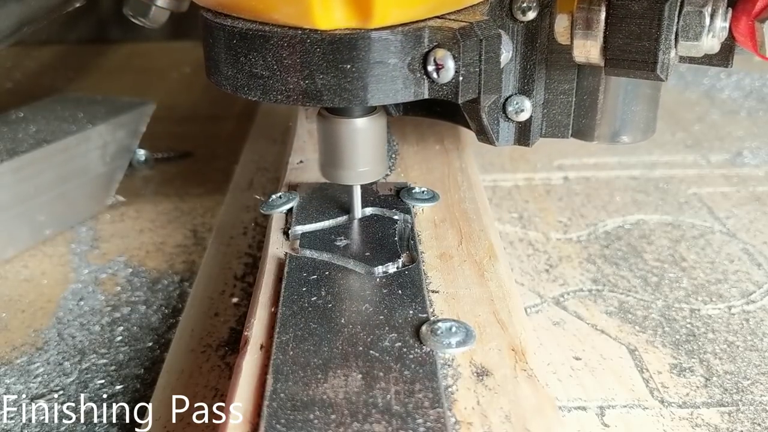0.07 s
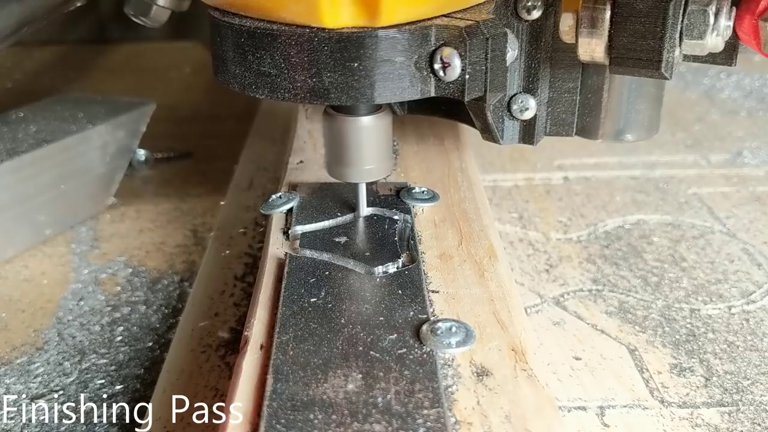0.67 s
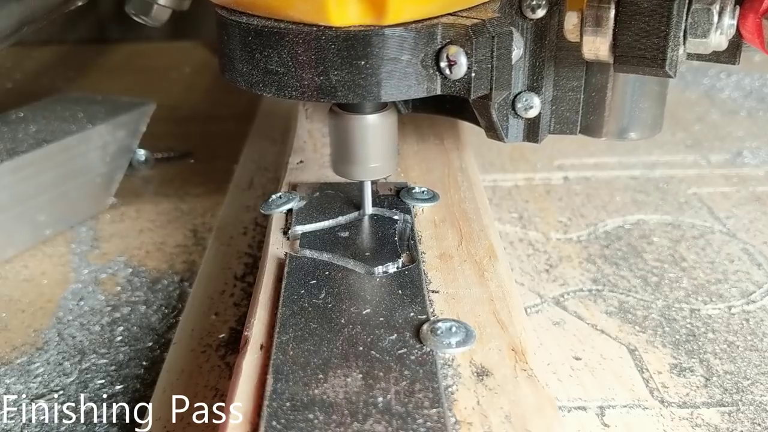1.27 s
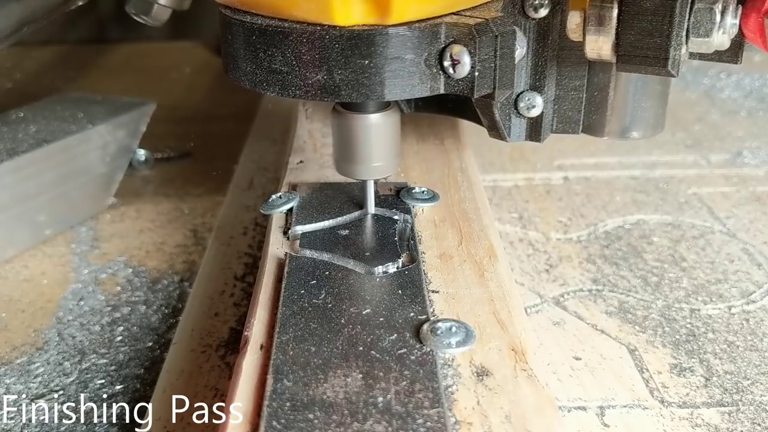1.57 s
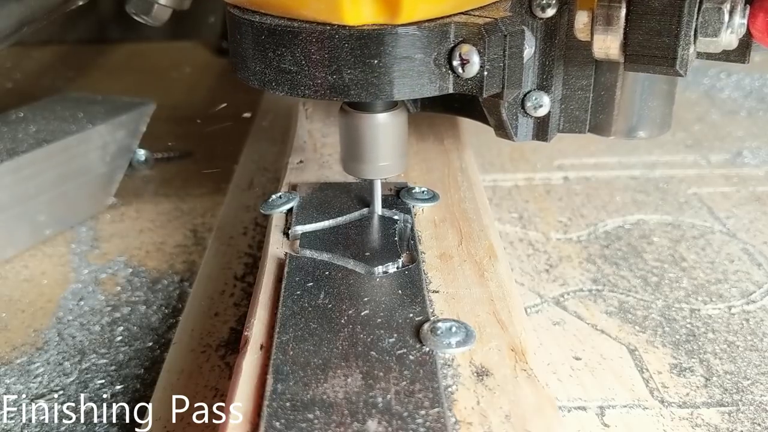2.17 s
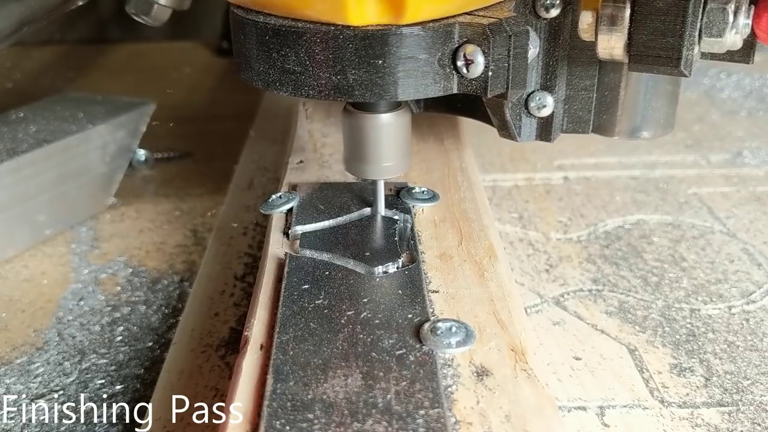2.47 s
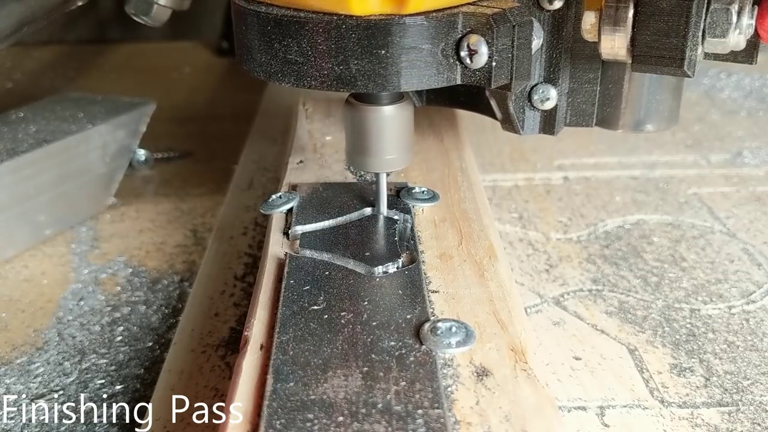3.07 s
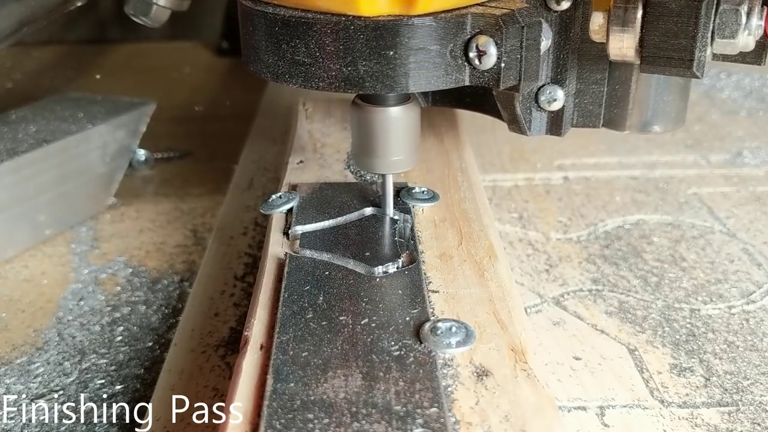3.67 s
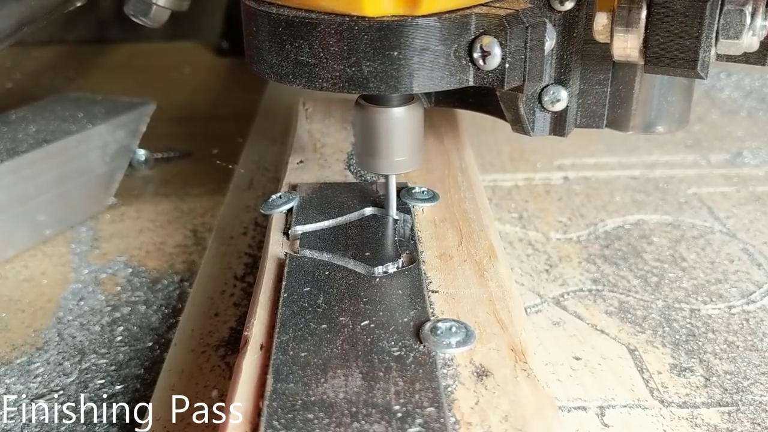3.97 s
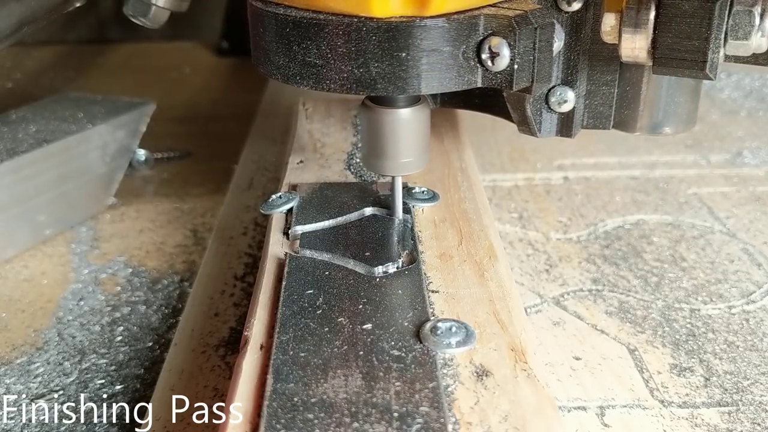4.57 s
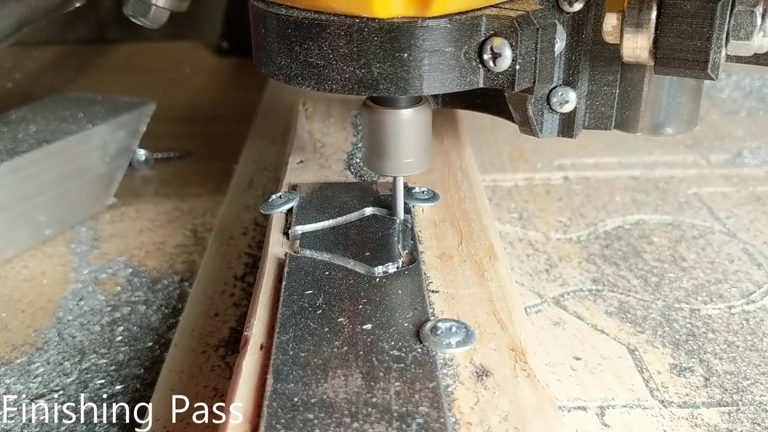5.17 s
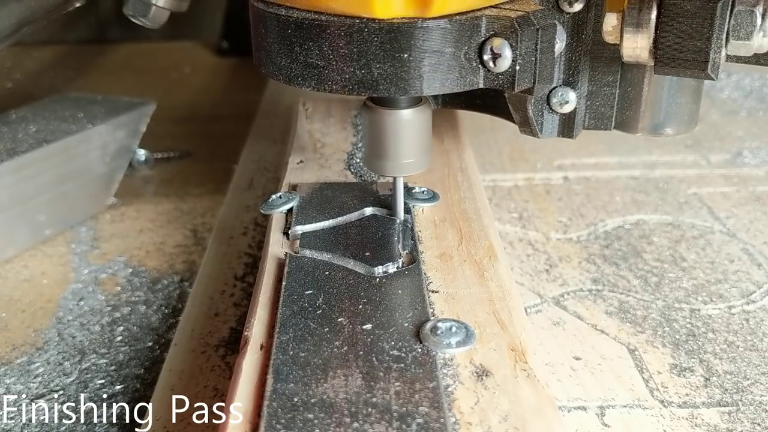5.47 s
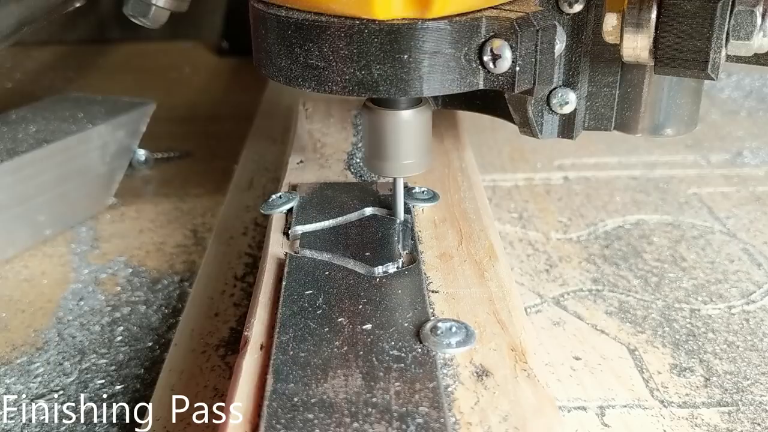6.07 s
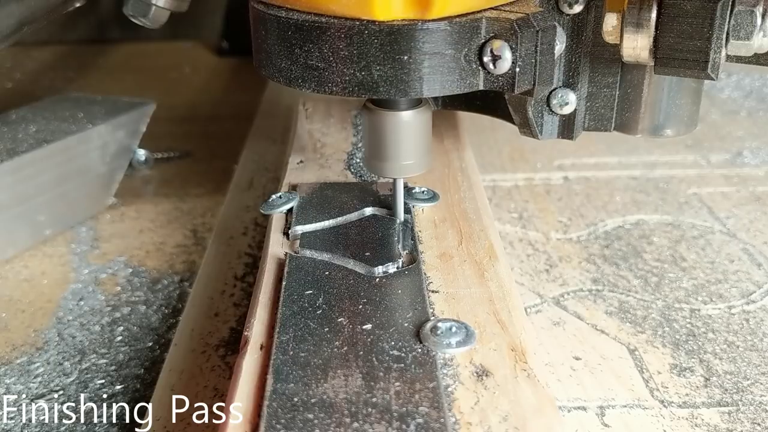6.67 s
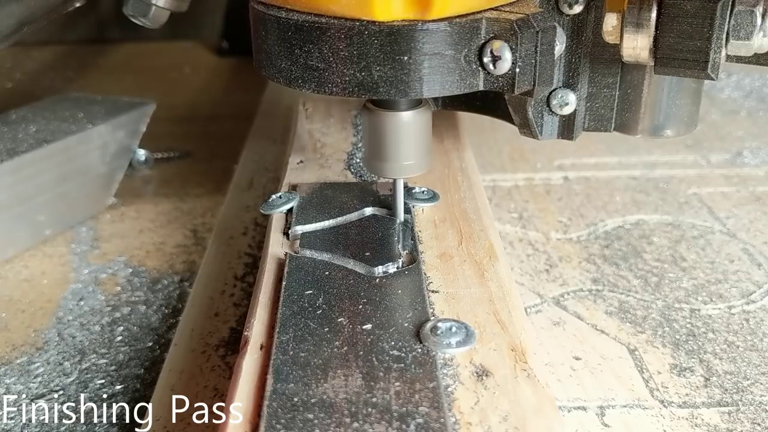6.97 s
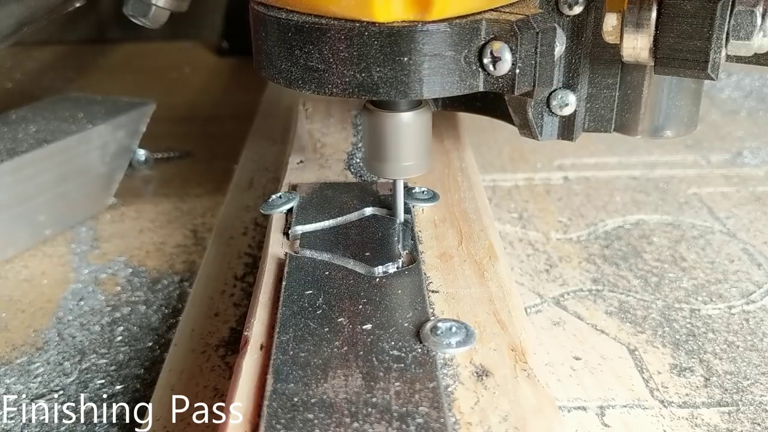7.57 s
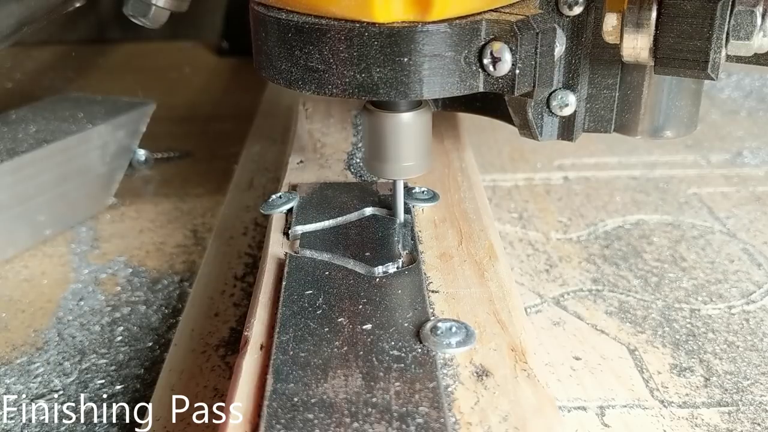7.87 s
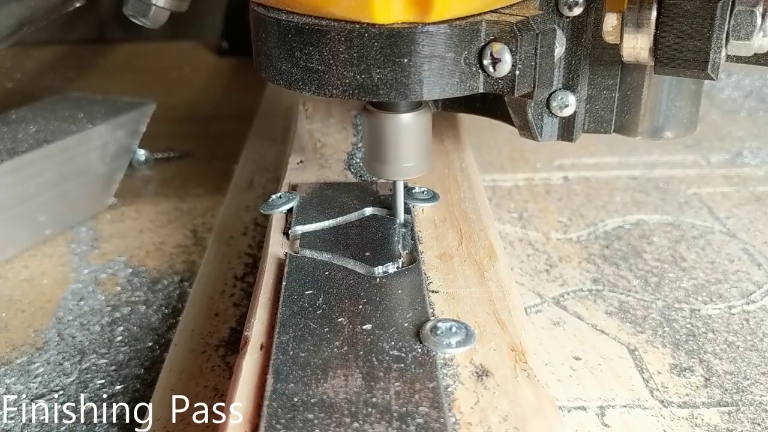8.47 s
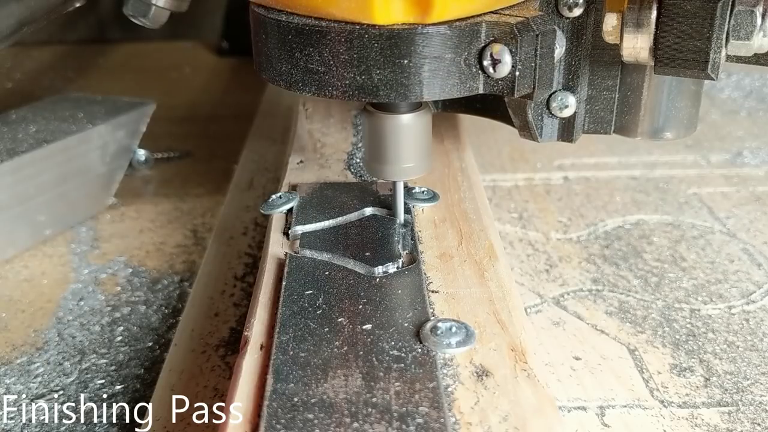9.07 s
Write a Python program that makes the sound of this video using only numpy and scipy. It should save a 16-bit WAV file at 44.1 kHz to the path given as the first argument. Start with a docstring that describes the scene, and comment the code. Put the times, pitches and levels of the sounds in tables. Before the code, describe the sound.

A small router whines and hisses steadily as it cuts steel, very close, with its cooling air buffeting the microphone.

```python
"""A whine over rushing air, very close: a trim router on a small CNC machine, finishing steel.
The whine is its 13-blade fan; cooling air roars in the housing and hisses from the vents.
The cutter rasps while it bites and chatters briefly in a corner. The motor sags under the cut
and speeds up as the cutter comes free. The fan's draught buffets the microphone."""
import sys
import numpy as np
from scipy import signal
from scipy.fft import rfft, irfft, next_fast_len
from scipy.io import wavfile
from scipy.ndimage import uniform_filter1d, minimum_filter1d

SR = 44100
rng = np.random.default_rng(int(sys.argv[2]) if len(sys.argv) > 2 else 0)


def generate_wav(sig):
    """Save sig (samples, or channels by samples) to the path in sys.argv[1] as 16-bit PCM at SR."""
    pcm = np.round(np.clip(np.atleast_2d(sig).T, -1, 1) * 32767).astype(np.int16)
    wavfile.write(sys.argv[1], SR, pcm)


N = 411012

# Draught on the microphone. Each row: time in seconds, relative level in dB.
DRAUGHT_DB = [(0, -32), (.55, -33), (1.0, -38.5), (1.5, -35), (1.7, -41.5), (2.2, -35), (2.55, -39.5),
              (3.2, -38.5), (3.7, -37), (4.55, -38), (4.9, -42.5), (5.35, -39.5), (6.15, -47.5),
              (7.05, -50), (7.2, -41), (8.2, -42.5), (8.36, -35.5), (8.7, -41.5)]
# Turbulence of the draught. Each row: frequency in Hz, relative density in dB.
LARGE_EDDY_SPECTRUM = [(20, -50), (35, -23), (50, -18), (65, 0.5), (125, 1.5), (200, -2.5), (320, -7.5),
                       (500, -13.5), (800, -28), (1600, -42)]
# Smaller eddies of fast air. Each row: frequency in Hz, relative density in dB.
SMALL_EDDY_SPECTRUM = [(20, -46), (35, -22), (60, -2.5), (150, 1.5), (300, 0), (480, -4.5), (750, -7.5),
                       (1600, -38)]
# Strongest puffs. Each row: time in seconds, relative peak in dB.
STRONG_PUFFS = [(0.338, -19), (.46, -22), (.523, -21), (.908, -23), (1.04, -25), (1.256, -24), (1.946, -19),
                (2.236, -21), (2.845, -20), (3.751, -19), (4.394, -19), (5.06, -24), (5.48, -25),
                (5.804, -27), (6.2, -27), (7.834, -22), (8.385, -17), (8.492, -21)]
# Cooling air. Each row: time in seconds, relative rush level in dB, relative hiss level in dB.
AIR_DB = [(0, -29.5, -33), (.75, -30.5, -34), (1.6, -28.5, -32), (2.4, -29, -31), (3.4, -28.5, -31.5),
          (6.4, -28.5, -31), (9.32, -29, -31.5)]
# Rush through the housing. Each row: frequency in Hz, relative density in dB.
RUSH_SPECTRUM = [(40, -8), (120, -22), (350, -20), (590, -10), (800, 1), (1150, -1), (1500, -6.5),
                 (2400, -6), (3100, -1.5), (3900, -1.5), (4300, -4), (5200, -10), (6200, -8), (8000, -27)]
# Housing cavities. Each row: centre in Hz, width in Hz, lift in dB.
HOUSING_RESONANCES = [(840, 130, 2), (1036, 106, 10), (1280, 48, 4.5), (1987, 110, 3.5), (2060, 80, -1),
                      (2637, 62, 3.5), (4240, 180, -4), (4500, 430, 5)]
# Jets at the vents. Each row: frequency in Hz, relative density in dB.
JET_SPECTRUM = [(3500, -25), (5400, -5), (6150, -2), (6800, 2), (7350, 0.5), (7900, -5.5), (8400, -14.5),
                (9500, -14), (11400, -14), (12000, -21.5), (14000, -17.5), (16000, -32)]
# Vent slots. Each row: centre in Hz, width in Hz, lift in dB.
VENT_RESONANCES = [(6165, 260, 4.5), (8940, 260, 4.5), (10270, 320, 4), (12400, 350, 5), (13750, 350, -1)]
# Spindle speed. Each row: time in seconds, turns per second.
SPEED_HZ = [(0, 447.1), (0.88, 445.2), (1.35, 445.3), (2.4, 449.4), (2.75, 448.9), (2.98, 451.5),
            (3.8, 451.6), (4.6, 451.1), (5.0, 453.1), (5.4, 454.0), (6.5, 454.8), (7.8, 455.1),
            (8.35, 454.5), (9.0, 455.5)]
# Shaft tones. Each row: multiple of the speed, free level in dB, full-load level in dB.
SHAFT_HARMONICS = [(1, -49.5, -45.5), (2, -52, -45.5), (3, -63, -57), (4, -52.5, -52.5), (5, -55, -49),
                   (6, -48, -54), (7, -49, -48.5), (8, -75, -55), (9, -53, -45), (11, -67, -55),
                   (12, -49, -52.5), (15, -53, -59), (24, -66, -63), (31, -67, -66)]
# Cutting edge. Each row: multiple of the speed, relative level in dB, lift at full chatter in dB.
RASP_BANDS = [(6, -46, 1), (10, -45, 4), (14, -41.5, -7), (15, -57, 0), (16, -41.5, -4), (17, -40.5, -3),
              (21, -55, 8), (24, -67, 6), (27, -60, 13), (28, -66, 1)]
# Chatter, peaking as the cutter rounds the corner. Each row: time in seconds, strength from 0 to 1.
CHATTER_STRENGTH = [(0, 0.1), (1.4, 0), (1.9, 0.26), (2.35, 0.46), (2.68, 0.85), (2.9, 0.1), (5.0, 0)]
# Tones locked to tool and plate resonances. Each row: multiple of the speed, full-chatter level in dB.
SINGING_HARMONICS = [(6, -40.5), (9, -50), (15, -52)]
# Blade-passing tone. Each row: time in seconds, level in dB before the lift with sag.
BLADE_DB = [(0, -40.5), (.8, -49), (1.4, -47.5), (1.65, -42.5), (2.2, -40), (2.9, -40.5), (3.1, -35),
            (4.15, -33.5), (4.5, -36.5), (5.3, -28), (5.65, -30), (6.2, -31), (6.6, -29), (7.6, -27.7),
            (8.4, -31), (9.32, -29)]
# Octave of the blade tone. Each row: time in seconds, level in dB.
OCTAVE_DB = [(0.0, -39.5), (0.62, -40), (1.27, -44), (1.48, -40.5), (1.76, -39.5), (2.57, -48), (2.73, -42),
             (2.83, -46), (3.66, -40.5), (6.88, -44.5), (8.72, -43), (8.82, -48), (9.03, -45), (9.32, -44)]


def from_db(db):
    """Decibels to gain."""
    return 10 ** (np.asarray(db) / 20)


def unit_rms(x):
    """Scale to rms 1."""
    return x / np.sqrt(np.mean(x ** 2) + 1e-20)


def curves(rows):
    """Each column of a time table, at every sample."""
    times_s, *columns = np.transpose(rows)
    return [np.interp(np.arange(N) / SR, times_s, column) for column in columns]


def drift(rate_hz):
    """Slow random wander, rms 1."""
    hop = 20
    pole = np.exp(-2 * np.pi * rate_hz * hop / SR)
    white = rng.standard_normal(N // hop + 4002)
    slow = signal.lfilter([1], [1, -2 * pole, pole * pole], white)[4000:]   # skip the settling
    return np.interp(np.arange(N) / hop, np.arange(len(slow)), unit_rms(slow))


def coloured_noise(spectrum, resonances=()):
    """Noise with a smooth spectrum, lifted or dipped at each resonance; rms 1."""
    size = next_fast_len(N)
    hz = np.maximum(np.fft.rfftfreq(size, 1 / SR), 1)
    points_hz, points_db = np.transpose(spectrum)
    shape_db = np.interp(np.log(hz), np.log(points_hz), points_db)
    for centre_hz, width_hz, lift_db in resonances:
        shape_db += lift_db / (1 + (2 * (hz - centre_hz) / width_hz) ** 2)
    white = rfft(rng.standard_normal(size))
    return unit_rms(irfft(white * from_db(shape_db), size)[:N])


def tone(angle, level_db, flutter, flutter_hz):
    """A sine shaken in amplitude and phase by the moving air."""
    in_phase = (1 + flutter * drift(flutter_hz)) * np.sin(angle)
    quadrature = flutter * drift(flutter_hz) * np.cos(angle)
    return from_db(level_db) * unit_rms(in_phase + quadrature)


def limiter(x, ceiling_db=-15.5, release_db_per_s=900):
    """Gain ducks just ahead of each peak over the ceiling and recovers within milliseconds."""
    peak_db = 20 * np.log10(np.abs(x).max(axis=0) + 1e-9)
    over_db = np.maximum(peak_db - ceiling_db, 0)
    ramp_db = release_db_per_s * np.arange(N) / SR
    duck_db = np.maximum.accumulate(over_db + ramp_db) - ramp_db
    held_db = minimum_filter1d(-duck_db, size=65)
    return x * from_db(uniform_filter1d(held_db, size=65))


def draught(level_db, lump_db=4.0, lump_hz=40, gust_db=1.4, gust_hz=9, trim_db=1.94, fast_db=-31):
    """Eddies cross the microphone port in gusts of short lumps; faster air carries more small ones."""
    small_share = np.clip(from_db(level_db - fast_db) ** 2, 0, .8)
    large = np.sqrt(1 - small_share) * coloured_noise(LARGE_EDDY_SPECTRUM)
    small = np.sqrt(small_share) * coloured_noise(SMALL_EDDY_SPECTRUM)
    swell_db = lump_db * np.clip(drift(lump_hz), -2, 1.5) + gust_db * drift(gust_hz)
    return from_db(level_db + trim_db) * unit_rms(from_db(swell_db) * (large + small))


def puffs(draught_db, sigma_s=0.0031, usual_db=-37.5, usual_per_s=5.4, lesser_db=-26, trim_db=1.5):
    """Each strong eddy gives a soft thud; lesser ones fall at random, more and louder in more draught."""
    t = np.arange(N) / SR
    eddies = coloured_noise(SMALL_EDDY_SPECTRUM)
    push_db = 0.53 * (draught_db - usual_db)
    born = rng.random(N) < usual_per_s * from_db(push_db) / SR
    size_db = lesser_db + push_db + 2.2 * rng.standard_normal(N)
    out = np.zeros(N)
    for time_s, peak_db in [*STRONG_PUFFS, *zip(t[born], size_db[born])]:
        near = np.abs(t - time_s) < 10 * sigma_s
        thud = eddies[near] * np.exp(-.5 * ((t[near] - time_s) / sigma_s) ** 2)
        out[near] += from_db(peak_db + trim_db) * thud / np.abs(thud).max()
    return out


def cooling_air(angle, load, rush_trim_db=0.63, hiss_trim_db=1.0, chop=0.067, full_load_db=-1):
    """Air roars in the housing and hisses from the vents; each turn chops the hiss a little."""
    rush_db, hiss_db = curves(AIR_DB)
    rush = from_db(rush_db + rush_trim_db) * coloured_noise(RUSH_SPECTRUM, HOUSING_RESONANCES)
    hiss = from_db(hiss_db + hiss_trim_db) * coloured_noise(JET_SPECTRUM, VENT_RESONANCES)
    hiss *= 1 + chop * np.sin(angle)
    return (rush + hiss) * from_db(full_load_db * load)


def shaft(angle, load):
    """Unbalance and cutting force repeat every turn; most harmonics grow with load."""
    out = np.zeros(N)
    for multiple, free_db, loaded_db in SHAFT_HARMONICS:
        level_db = free_db + (loaded_db - free_db) * load
        out += rng.choice([-1, 1]) * tone(multiple * angle, level_db, flutter=0.15, flutter_hz=13)
    return out


def cutter(angle, load, rasp_trim_db=-1, width_hz=32):
    """Unequal chips smear the edge's harmonics into rough bands; chatter makes a few sing."""
    chatter, = curves(CHATTER_STRENGTH)
    rasp = np.zeros(N)
    for multiple, level_db, lift_db in RASP_BANDS:
        band = drift(width_hz) * np.sin(multiple * angle) + drift(width_hz) * np.cos(multiple * angle)
        rasp += from_db(level_db + lift_db * chatter) * unit_rms(band)
    # A driven resonance lags the force by a quarter cycle.
    singing = sum(tone(multiple * angle - np.pi / 2, level_db, flutter=0.24, flutter_hz=24)
                  for multiple, level_db in SINGING_HARMONICS)
    return from_db(rasp_trim_db) * load * rasp + chatter * singing


def fan(angle, sag_hz, blades=13, lift_db_per_hz=1, waver_db=0.12, waver_hz=2.6, ripple_hz=120):
    """Blade-passing tone, lifted as the speed sags, and its octave with faint mains sidebands."""
    blade_db, = curves(BLADE_DB)
    octave_db, = curves(OCTAVE_DB)
    blade_db += lift_db_per_hz * sag_hz + waver_db * drift(waver_hz)
    blade = tone(blades * angle, blade_db, flutter=0.061, flutter_hz=35)
    octave = tone(2 * blades * angle, octave_db, flutter=0.076, flutter_hz=45)
    mains_ripple = 1 + 0.09 * np.sin(2 * np.pi * ripple_hz * np.arange(N) / SR)
    return blade + octave * mains_ripple


def scene(free_hz=456, hunt_hz=0.119):
    """One shaft drives the router's sounds; its sag in speed sets the cutting load."""
    speed_hz, = curves(SPEED_HZ)
    draught_db, = curves(DRAUGHT_DB)
    sag_hz = free_hz - speed_hz
    load = np.sqrt(np.clip((sag_hz - 1) / 9, 0, 1))   # none at 1 Hz of sag, full at 10 Hz
    angle = 2 * np.pi * np.cumsum(speed_hz + hunt_hz * drift(rate_hz=23.8)) / SR
    router = fan(angle, sag_hz) + shaft(angle, load) + cutter(angle, load) + cooling_air(angle, load)
    return np.tile(router + draught(draught_db) + puffs(draught_db), (2, 1))


def record(dry, low_cut_hz=42, high_cut_hz=15800):
    """One microphone on both channels: rumble cut, peak limiter, steep treble cut."""
    low_cut = signal.butter(5, low_cut_hz, "high", fs=SR, output="sos")
    high_cut = signal.ellip(12, .1, 80, high_cut_hz, fs=SR, output="sos")
    return signal.sosfilt(high_cut, limiter(signal.sosfilt(low_cut, dry)))


dry = scene()
out = record(dry)
generate_wav(out)
```